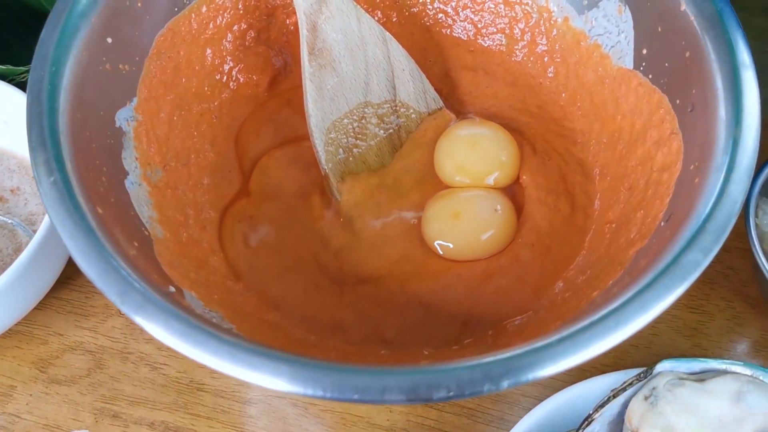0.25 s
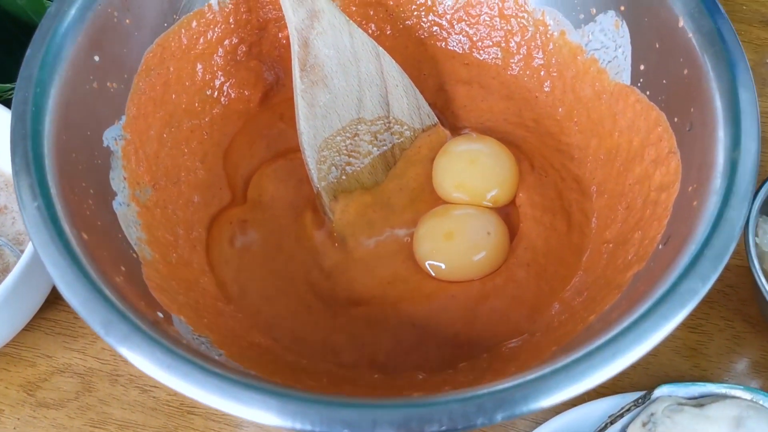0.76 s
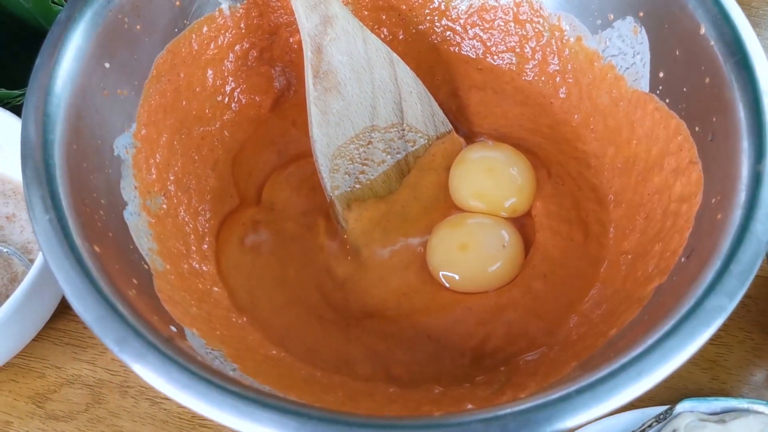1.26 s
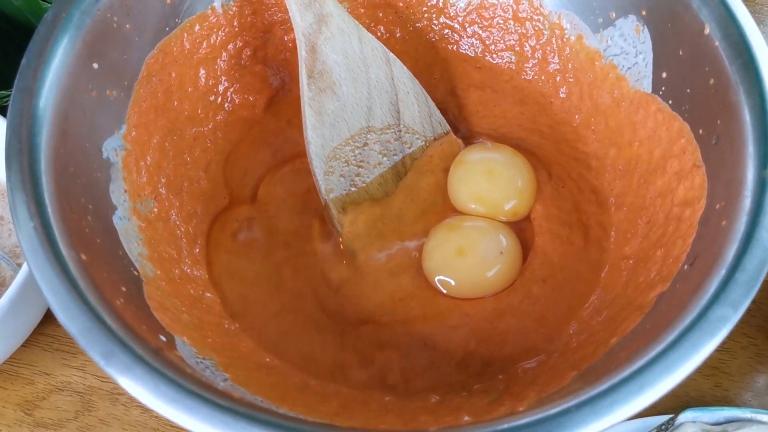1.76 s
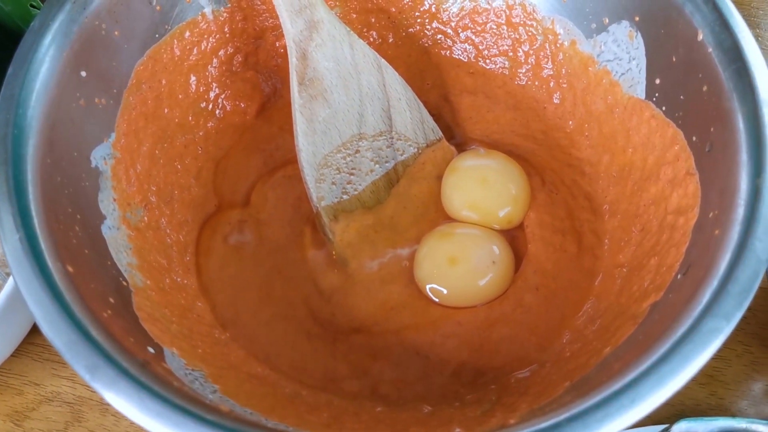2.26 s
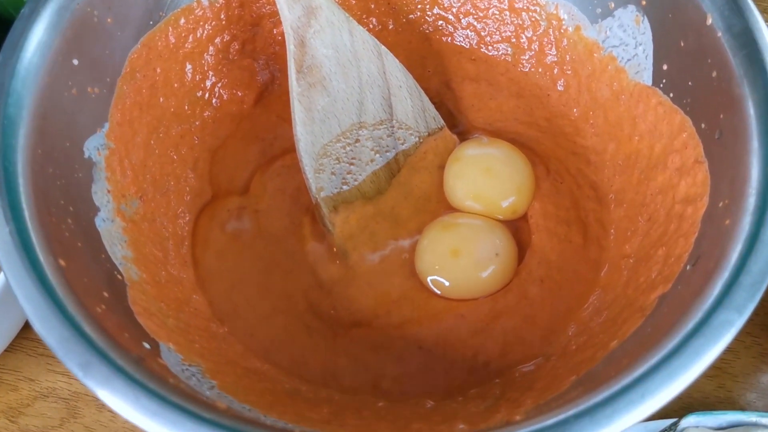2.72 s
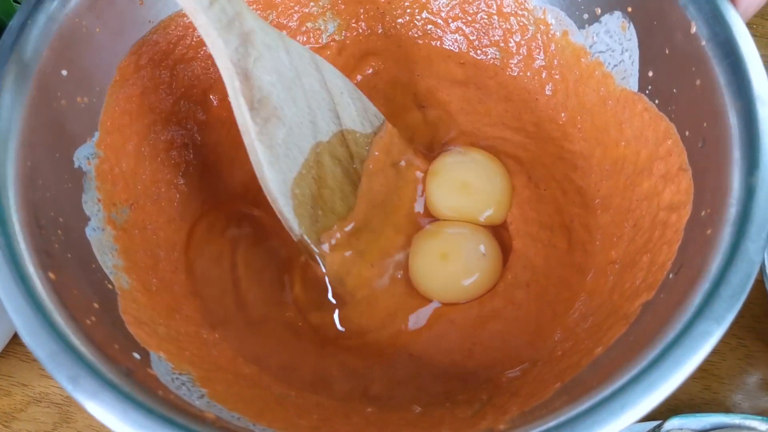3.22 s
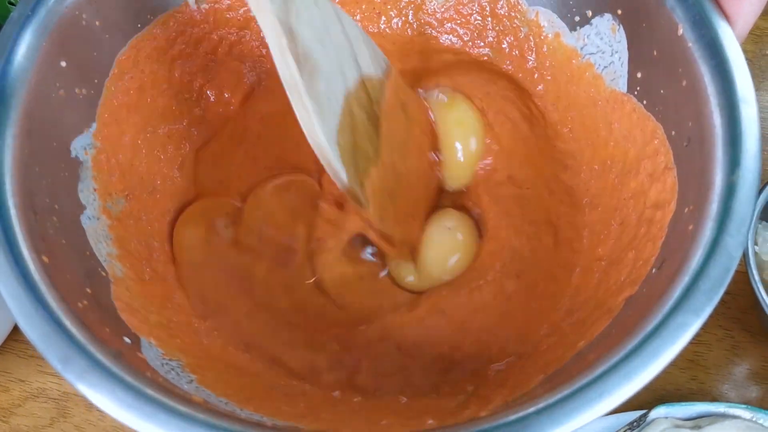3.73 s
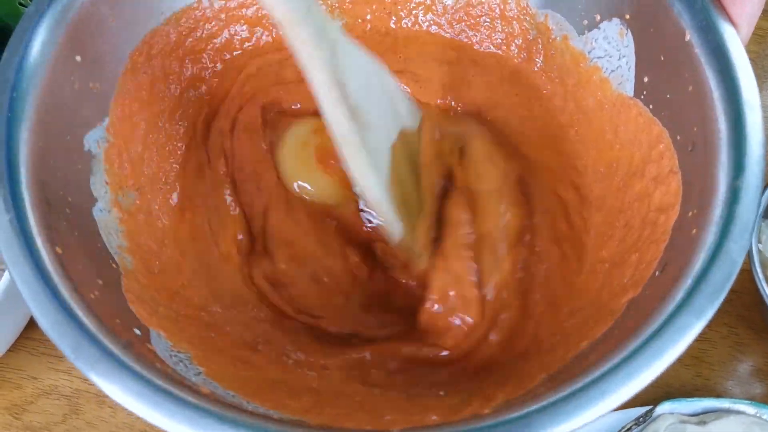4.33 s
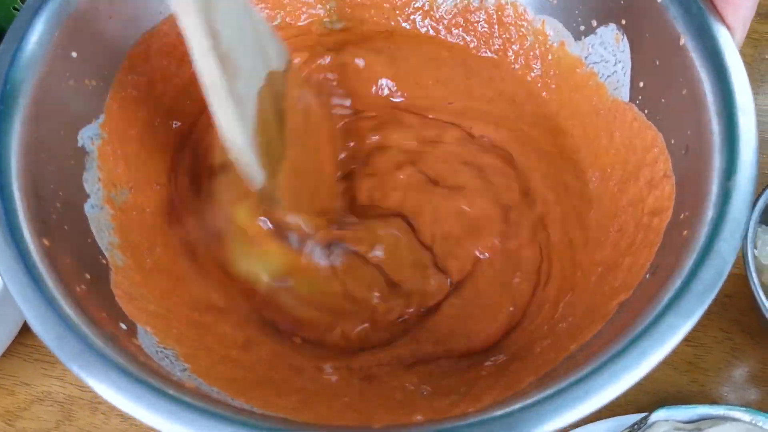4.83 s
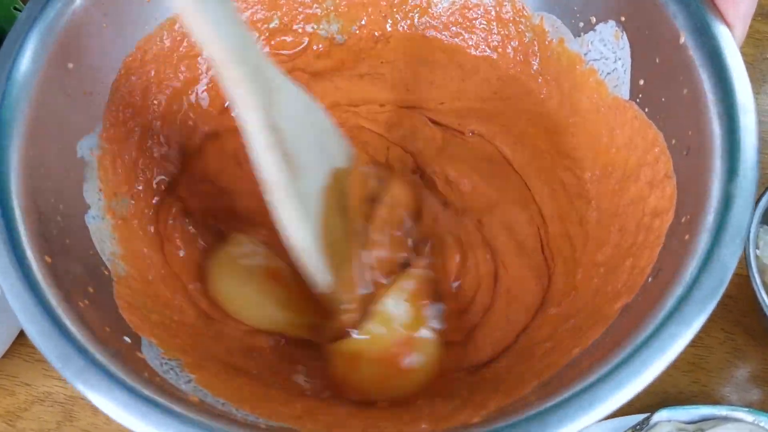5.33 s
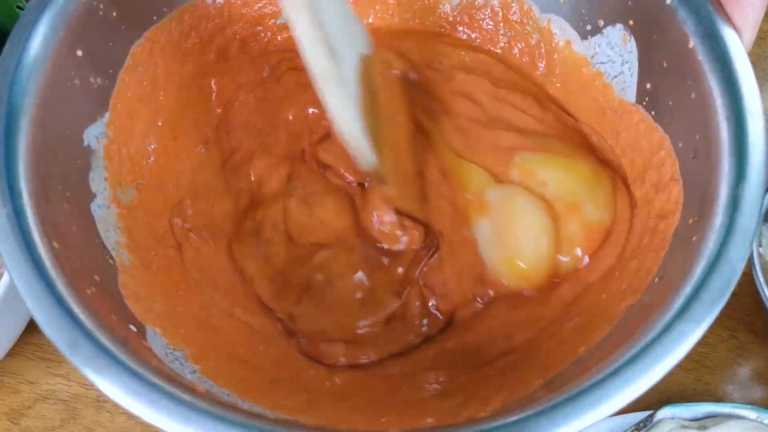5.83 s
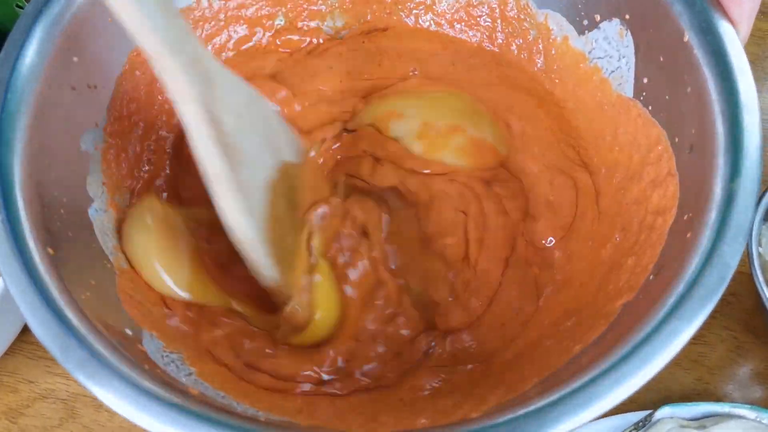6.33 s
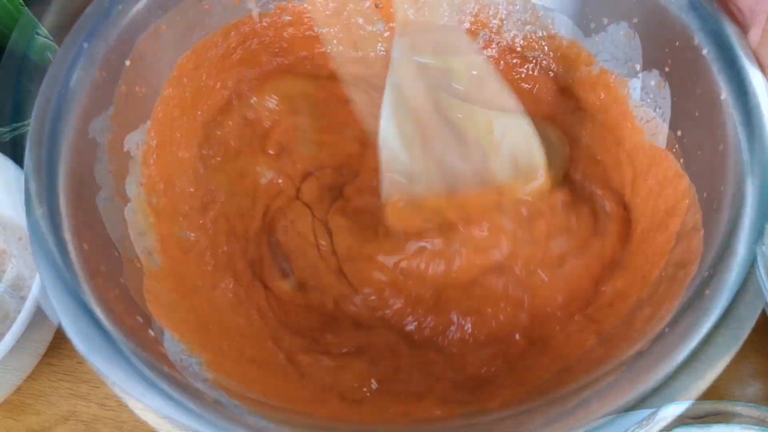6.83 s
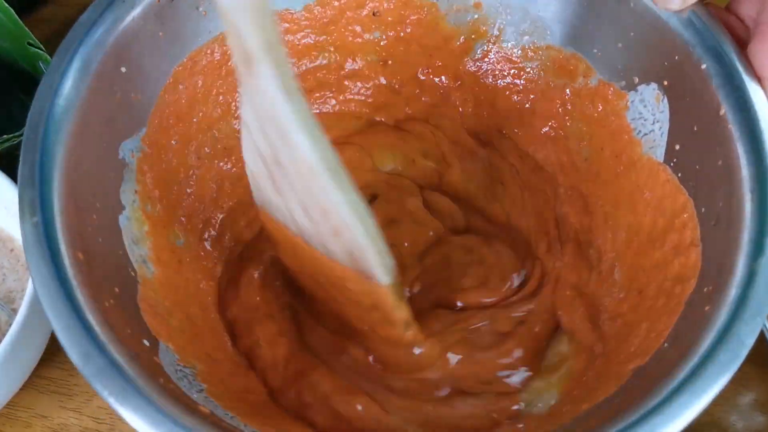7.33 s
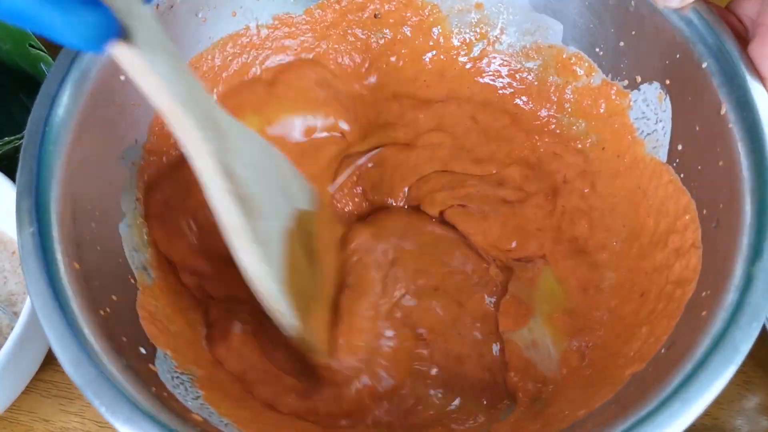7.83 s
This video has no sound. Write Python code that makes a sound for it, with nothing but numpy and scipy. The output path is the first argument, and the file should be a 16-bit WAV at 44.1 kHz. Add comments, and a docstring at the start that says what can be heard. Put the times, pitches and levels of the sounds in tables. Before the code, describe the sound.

In a lively kitchen, dishes knock sharply on a wooden table, then a spatula stirs thick batter with small wet pops and dull bowl bumps.

```python
"""In a hard-walled kitchen a small bowl and then a second dish are knocked and set on a wooden table.
A gloved hand slides along a spatula, which then stirs a thick batter in a steel bowl.
Dishes are noise thuds with dying sines; the batter is soft noise, cracks and short ringing cavities.
An appliance hums with wavering tones over the quiet noise of the room; random reflections make the walls."""
import sys
import numpy as np
from scipy import signal
from scipy.fft import rfft, irfft
from scipy.io import wavfile
from scipy.ndimage import uniform_filter1d

SR = 44100
rng = np.random.default_rng(int(sys.argv[2]) if len(sys.argv) > 2 else 0)


def wav_record(signal):
    """Record a signal, one row per channel, as 16-bit PCM in the file named by sys.argv[1]."""
    frames = np.transpose(np.atleast_2d(signal))
    bounded = np.clip(frames, -1, 1)
    # unit amplitude maps onto the largest positive 16-bit level
    quanta = np.round(bounded * 32767).astype(np.int16)
    wavfile.write(sys.argv[1], SR, quanta)


N = 355887  # length in samples


def gain_of(db):
    """Turns decibels into a multiplying factor."""
    return 10 ** (np.asarray(db) / 20)


def evened(x):
    """Scales a sound to an rms (average strength) of 1."""
    return x / np.sqrt(np.mean(x ** 2) + 1e-20)


def read(points, hz):
    """Reads a table between its points, on a logarithmic frequency scale."""
    table_hz, value = np.transpose(points)
    return np.interp(np.log(hz + 1e-3), np.log(table_hz), value)


def add(mix, s, sound, pan_db):
    """Places a two-channel sound at a time; the nearer microphone gets it louder and a little earlier."""
    for row, wave, side in zip(mix, sound, (1, -1)):
        lead_s = side * np.clip(pan_db, -8, 8) * 1.2e-5
        part = row[round((s - lead_s) * SR):][:len(wave)]
        part += wave[:len(part)] * gain_of(side * pan_db / 2)


def partner(left, other, same):
    """Mixes a right channel that is like the left by the share same (1 = identical, 0 = unrelated)."""
    return same * left + np.sqrt(1 - same ** 2) * other


def noise(spectrum, same, patchy_db, lean=0, size=512):
    """Two-channel noise from random short-time spectra, with patches that drift in time and pitch."""
    frames, hz = N // (size // 4) + 5, np.fft.rfftfreq(size, 1 / SR)
    a, b, c, d, patches = rng.standard_normal((frames, len(hz), 5)).T
    patches = uniform_filter1d(uniform_filter1d(patches, size=8, axis=0), size=12, axis=1)
    patches = evened(patches)
    same = np.clip(same * np.ones(len(hz)), -1, 1)[:, None]
    left = a + 1j * b
    right = partner(left, c + 1j * d, same) / gain_of(lean)
    colour = gain_of(read(spectrum, hz)[:, None] + patchy_db * patches)
    below_top = (hz < spectrum[-1][0])[:, None]
    frames_out = np.array([left, right]) * colour * below_top
    return evened(signal.istft(frames_out, nperseg=size, noverlap=size * 3 // 4)[1][:, :N])


def burst(spectrum, unit_hz, tilt_db, t60, rise_s, same):
    """A short dying puff of noise, peak about 1; the spectrum is read in multiples of unit_hz."""
    t, hz = np.arange(8192) / SR, np.fft.rfftfreq(8192, 1 / SR)
    a, b = rng.standard_normal((2, 8192))
    pair = np.array([a, partner(a, b, np.clip(same, -1, 1))])
    colour = gain_of(read(spectrum, hz / unit_hz) + tilt_db * np.log2(hz / 6000 + 0.00033))
    rise = np.sin(np.pi / 2 * np.minimum(t / rise_s, 1)) ** 2
    return evened(irfft(rfft(pair) * colour)) * gain_of(-60 * t / t60) * rise / 2


FULL_FLUTTER_HZ = 5000  # lower modes flutter less and differ less between the microphones


def ring(hz, db, t60, free_s, rise_s, spread, flutter):
    """Dying sines, damped harder after free_s; chatter makes each mode flutter, each microphone has its phase."""
    share = np.clip(hz / FULL_FLUTTER_HZ, .35, 1)[:, None]
    t = np.arange(30000) / SR
    phase = spread * share * rng.standard_normal((2, len(hz), 1))
    chatter = signal.resample_poly(rng.standard_normal((2, len(hz), 100)), 300, 1, axis=2)
    damping_db = 400 * np.maximum(t - free_s, 0)
    fall_db = 60 * t / np.clip(t60, .01, 1.2)[:, None] + damping_db
    fade = gain_of(db[:, None] - fall_db) * np.minimum(t / rise_s, 1) * (1 + flutter * share * chatter)
    return (fade * np.sin(2 * np.pi * hz[:, None] * t + phase)).sum(1)


def fuzz(width_hz):
    """Slow complex noise that spreads a tone into a narrow band."""
    memory = np.exp(-np.pi * width_hz / SR)
    drift = evened(signal.lfilter([1], [1, -memory], rng.standard_normal((2, N))))
    return drift[0] + 1j * drift[1]


# how the main hum swells, sinks and drifts: start_s, level_db, pitch_hz
HUM_PATH = [(0.0, -57, 173.0), (0.38, -48.5, 170.3), (0.69, -54, 170.9), (0.85, -42.5, 172.7),
            (0.94, -53.5, 174.8), (1.37, -49.5, 172.8), (1.41, -53, 170.9), (2.22, -50.5, 175.2),
            (2.43, -45, 172.4), (2.58, -53, 171.4), (3.01, -44, 171.8), (3.12, -58.5, 171.6),
            (3.23, -53.5, 176.6), (4.02, -48.5, 170.3), (4.43, -46, 173.3), (5.12, -50, 173.0),
            (5.28, -40.5, 173.0), (6.0, -44.5, 172.8), (6.34, -43.5, 170.5), (6.68, -58.5, 169.4),
            (6.79, -45, 170.7), (6.99, -40.5, 173.4), (7.4, -50.5, 172.8), (8.07, -49, 171.2)]
HUM_WAVER_WIDTH_HZ, HUM_WAVER_DB = 4, -8.5  # narrow fuzz around the tone, in dB relative to it
UPPER_HUM_HZ, UPPER_HUM_WIDTH_HZ, UPPER_HUM_DB = 220, 5, -57
LOW_HUM_HZ, LOW_HUM_WIDTH_HZ, LOW_HUM_DB = 50.5, 3.4, -64


def hum():
    """A wavering tone with fuzzier ones above and below; all reach the left microphone first."""
    t, (s, db, hz) = np.arange(N) / SR, np.transpose(HUM_PATH)
    turn = np.exp(2j * np.pi * np.cumsum(np.interp(t, s, hz)) / SR)
    waver = gain_of(HUM_WAVER_DB) * fuzz(HUM_WAVER_WIDTH_HZ)
    tone = gain_of(np.interp(t, s, db)) * turn * (np.sqrt(2) + waver)
    upper = gain_of(UPPER_HUM_DB) * fuzz(UPPER_HUM_WIDTH_HZ) * np.exp(2j * np.pi * UPPER_HUM_HZ * t)
    low = gain_of(LOW_HUM_DB) * fuzz(LOW_HUM_WIDTH_HZ) * np.exp(2j * np.pi * LOW_HUM_HZ * t)
    # left, then right: a small step in level (dB) and in phase (radians)
    sides = gain_of([[.3], [-.3]]) * np.exp(1j * np.array([[.1], [-.1]]))
    return ((tone + upper + low) * sides).real


# colour of the room's noise: pitch_hz, level_db (relative, per Hz)
ROOM_COLOUR = [(18, -43.5), (30, -12), (40, -13.5), (50, -13.5), (65, -17), (110, -9.5), (140, -15.5),
               (200, -14.5), (340, -19.5), (720, -23), (900, -33.5), (2600, -40), (3500, -46),
               (7000, -50.5), (15800, -57)]
ROOM_DB = -52  # overall level
# how alike the room is in both microphones: pitch_hz, likeness (1 = the same)
ROOM_LIKENESS = [(40, .995), (120, .97), (300, .9), (700, .7), (1650, .3), (5000, .1), (15000, 0)]
# how the room leans to one side: pitch_hz, left_over_right_db
ROOM_LEAN = [(60, 2.5), (180, 6.5), (550, -0.5), (1650, -1), (4970, 1.5), (15000, -3)]


def room_tone():
    """Steady rumble and hiss of the kitchen: noise, more alike on both sides at low pitches."""
    hz = np.fft.rfftfreq(2048, 1 / SR)
    lean = read(ROOM_LEAN, hz)[:, None]
    return gain_of(ROOM_DB) * noise(ROOM_COLOUR, read(ROOM_LIKENESS, hz), patchy_db=2.5, lean=lean, size=2048)


# loudness of the stirring, before a fixed cut of 4.5 dB: start_s, level_db
STIR_LEVELS = [(3.0, -75.5), (3.3, -56.5), (3.51, -72), (4.16, -62), (4.9, -66.5), (6.05, -62), (6.47, -64),
               (6.83, -60), (7.66, -65), (8.07, -59.5)]
IDLE_DB = -76  # level at time 0, before the same cut
# colour of the swish: pitch_hz, level_db (relative, per Hz)
SWISH_COLOUR = [(900, -21), (2000, 1), (4500, -3.5), (7000, -4), (9000, -12.5), (15800, -11.5)]


def swish():
    """Soft wet noise of the batter that follows the stirring."""
    s, db = np.transpose(STIR_LEVELS)
    level_db = np.interp(np.arange(N) / SR, [0, *s], [IDLE_DB, *db]) - 4.5
    return gain_of(level_db) * noise(SWISH_COLOUR, same=0.2, patchy_db=4.0)


def knocks(rows, hz, modes, thud):
    """Each knock thuds on the table; the spot struck decides which modes of the dish ring."""
    thuds, rings = np.zeros((2, N)), np.zeros((2, N))
    t60s, *spots = np.transpose(modes)
    for s, db, thud_hz, t60, ring_db, spot, free_s, pan_db in rows:
        nearest_spot = min(round(spot), len(spots) - 1)
        level_db = ring_db + spots[nearest_spot]
        thud_sound = burst(thud, thud_hz, 0, t60, rise_s=0.0021, same=0.36)
        add(thuds, s, gain_of(db) * thud_sound, pan_db)
        ring_sound = ring(np.array(hz), level_db, t60s, free_s, rise_s=0.00015, spread=0.72, flutter=1.0)
        add(rings, s, ring_sound, pan_db)
    return np.array([thuds, rings])


# knocks on the small bowl: start_s, thud_peak_db (about), thud_pitch_hz, thud_60_db_fall_s, ring_db,
# spot_struck (rounded; past the last means the last), free_s (until a hand or the table damps it),
# left_over_right_db
SMALL_BOWL_STRIKES = [(.0235, -2, 950, 0.065, -3.5, 0.5, .3, -1.5),
                      (.031, -7.5, 970, 0.053, 0, 3, 0.028, -2.5), (.079, -21.5, 870, .08, 1, 1, 0.14, 3.5),
                      (.2245, -16, 930, 0.075, 5.5, 2, 0.0033, 5.5),
                      (.3135, -12, 713, 0.055, 0, 16, 0.36, -4)]
# pitches at which the small bowl rings: pitch_hz
SMALL_BOWL_PITCHES = [785, 985, 1140, 1500, 1723, 1759, 2955, 3059, 4060, 4159, 4204, 4330, 5335, 7111,
                      7198, 7343, 7800, 8383, 10560, 10705, 10830, 11040, 11420, 14700, 14835, 15030]
# a row for each of those pitches: 60_db_fall_s, then level_db for each spot struck (ring_db is added)
SMALL_BOWL_MODES = [(0.22, -18.5, -25, -25.5, -67, -51), (0.041, -19.5, -44, -41.5, -67, -54),
                    (0.2, -40, -24.5, -30, -67.5, -53), (0.12, -45, -27, -37, -68, -44),
                    (0.99, -45, -29.5, -47, -67, -65), (0.13, -34, -54, -73.5, -67, -65),
                    (0.62, -53.5, -74.5, -49, -70, -46), (0.2, -56, -66, -35.5, -68, -59),
                    (0.35, -50.5, -74, -29.5, -40.5, -51), (0.15, -27, -70, -42, -13.5, -24),
                    (0.14, -37, -74, -18, -25.5, -59), (0.48, -37, -71, -36.5, -25, -43.5),
                    (0.13, -61, -68.5, -49.5, -71.5, -37), (0.08, -42.5, -59.5, -31, -66.5, -65),
                    (0.2, -22.5, -71.5, -61.5, -67, -38), (0.245, -54.5, -68, -39, -66, -48),
                    (0.073, -64, -66.5, -34.5, -66.5, -39), (0.072, -77.5, -72, -47.5, -67, -46),
                    (0.19, -59, -69.5, -45, -66, -69), (0.28, -29, -69.5, -61, -71, -51.5),
                    (0.25, -61.5, -64.5, -42.5, -65.5, -75), (0.58, -42, -68.5, -67, -66, -65),
                    (0.16, -47.5, -66.5, -44, -69, -58), (0.1, -55.5, -71.5, -51.5, -65.5, -72),
                    (0.13, -58, -74.5, -56, -63, -70), (0.13, -57, -62, -49.5, -67, -54)]
# colour of the table's thud under it: multiple_of_thud_pitch, level_db (relative, per Hz)
SMALL_BOWL_THUD_COLOUR = [(.1, -45.5), (.22, -30), (.3, -11.5), (.42, -17), (.6, -7), (.85, 4), (1.3, -5),
                          (2.5, -12), (5, -22.5), (10, -43.5), (22, -52.5)]


def small_bowl():
    """The small bowl's modes ring over noise thuds of the table."""
    return knocks(SMALL_BOWL_STRIKES, SMALL_BOWL_PITCHES, SMALL_BOWL_MODES, SMALL_BOWL_THUD_COLOUR)


# a dish rocks on its foot and taps the table: start_s, peak_db (about), pitch_hz, left_over_right_db
ROCK_TAPS = [(0.035, -3.5, 757, -11.5), (0.099, -16.5, 1160, 10.5), (0.129, -22, 794, -3),
             (0.239, -14.5, 784, 14.5), (2.234, -16, 750, 13), (2.589, -23, 1140, 1), (2.619, -23, 800, -3),
             (2.669, -18, 1160, -4), (2.709, -25, 771, -12), (2.768, -21, 930, 0.5),
             (2.806, -22.5, 810, -5), (2.829, -28.5, 820, -9), (2.862, -26, 805, -11),
             (2.908, -35.5, 810, -27)]
# colour of a tap: multiple_of_pitch, level_db (relative, per Hz)
ROCK_COLOUR = [(.2, -30), (.5, -8), (.9, 0), (1.3, -4), (1.8, -22), (3, -50), (8, -80)]


def rocking():
    """Soft low taps without ring: short puffs of noise."""
    out = np.zeros((2, N))
    for s, db, hz, pan_db in ROCK_TAPS:
        tap = burst(ROCK_COLOUR, hz, 0, t60=.03, rise_s=0.0032, same=0.66)
        add(out, s, gain_of(db) * tap, pan_db)
    return out


# strokes of glove and spatula: start_s, rise_s, hold_s, fall_s, level_db
RUB_STROKES = [(0.392, 0.057, 0.096, .09, -58.5), (3.134, 0.05, .005, 0.028, -49.5),
               (3.194, 0.034, 0.053, 0.056, -46), (3.314, 0.081, 0.078, .02, -45.5),
               (7.334, 0.053, 0.042, .06, -58), (7.701, 0.028, 0.058, 0.024, -61.5)]
# colour of the rubbing: pitch_hz, level_db (relative, per Hz)
RUB_COLOUR = [(710, -45.5), (1200, -12), (1510, -19), (1680, -39.5), (1930, -7.5), (3100, -13.5), (4680, 0),
              (5160, -2), (10700, -1), (15800, -4)]
RUB_RANGE_DB = 20.5  # depth of each rise and fall


def rubbing():
    """Fine hiss of rubber or batter sliding over wood; each stroke rises, holds and falls."""
    t, level = np.arange(N) / SR, np.zeros(N)
    for s, rise, hold, fall, db in RUB_STROKES:
        times = np.cumsum([s, rise, hold, fall])
        shape_db = np.interp(t, times, [-RUB_RANGE_DB, 0, 0, -RUB_RANGE_DB], left=-99, right=-99)
        level += gain_of(db + shape_db)
    return level * noise(RUB_COLOUR, same=0.15, patchy_db=4.5, size=256)


SMALL_POP_COUNT, SMALL_POPS_FROM_S = 10, 4.0
SMALL_POP_DB, SMALL_POP_SPREAD_DB, SMALL_POP_CRACK_DB = -56.5, 5.5, 8  # lowest peak, spread above, crack over it
SMALL_POP_LOW_HZ, SMALL_POP_HIGH_HZ = 1150, 2400


def small_pops():
    """Small pockets burst at random while the batter is stirred; rows like those of the clear pops."""
    rows = []
    for when, size, pitch, side in rng.random((SMALL_POP_COUNT, 4)):
        s = SMALL_POPS_FROM_S + when * (N / SR - SMALL_POPS_FROM_S)
        db = SMALL_POP_DB + SMALL_POP_SPREAD_DB * size
        hz = SMALL_POP_LOW_HZ * (SMALL_POP_HIGH_HZ / SMALL_POP_LOW_HZ) ** pitch
        rows.append((s, db, hz, SMALL_POP_CRACK_DB, 2.5, 12 * (side - .5)))
    return rows


# clear pops in the batter, and the clicks of two spatula bumps (6.87, 7.23 s): start_s, peak_db,
# cavity_pitch_hz, crack_over_cavity_db, crack_brightness_db_per_octave, left_over_right_db
POPS_AND_CLICKS = [(0.8237, -50, 5500, -4, 1.5, -1), (3.7404, -39.5, 1920, 2, -1.5, -1.5),
                   (3.9505, -37.5, 1865, -4, -3, 14.5), (4.0021, -31, 2874, 12.5, 7, 1.5),
                   (4.1638, -36.5, 4740, -15, 9, 12), (4.1688, -39, 1900, 9, -1, 5),
                   (4.4556, -38, 1366, 9.5, -5, 6.5), (4.4676, -35.5, 1913, -1, 4, 2),
                   (4.5418, -48, 4610, 9, 0, 0.5), (4.792, -41, 2185, -7, -1, -4),
                   (4.8209, -28, 6000, -5, 7, 5), (4.9734, -34.5, 5770, 22.5, 8.5, -7),
                   (5.5379, -59, 2354, 14, -4, 0), (5.7142, -47, 1220, 4, 7, 0.5),
                   (5.743, -41, 1270, -2.5, 5, -8), (5.9293, -37.5, 5400, -1, 9, -7.5),
                   (6.236, -56, 2120, 19, 9.5, 0.5), (6.4383, -33.5, 6900, -3, 2, -5),
                   (6.549, -31.5, 2154, 3, 11, -1.5), (6.5578, -21, 10670, -15, 17, -4.5),
                   (6.7083, -42, 5560, 15, 8, 6), (6.8455, -56.5, 1196, 18.5, 4, -1),
                   (6.8705, -41, 1095, 12.5, -1.5, 5.5), (7.0614, -35, 4730, 12.5, 9, -1.5),
                   (7.202, -39, 3000, 1, 3, -8.5), (7.2276, -35, 1146, -1, -3, -1.5),
                   (7.518, -55.5, 1394, 20.5, 5, -5.5), (7.735, -33, 6000, -5, 3.5, 1.5),
                   (7.764, -36.5, 5020, -10, 4, 1), (7.8956, -52.5, 4030, 17.5, 8.5, -2),
                   (7.9983, -62.5, 1500, 15, 5.5, 3.5), (8.023, -43, 2320, 11.5, -2.5, 0)]
# colour of a crack: pitch_hz, level_db (relative, per Hz)
CRACK_COLOUR = [(900, -39), (1800, -29), (3000, 7), (4500, 7.5), (6000, 7.5), (8000, -6.5), (11000, 0.5),
                (15000, -9), (17000, -14.5)]
# echoes inside the steel bowl: delay_s, level_db
STEEL_ECHOES = [(.0016, -10), (.0034, -13), (.0055, -17)]
BOWL_ECHO_TOP_HZ = 7160  # batter on the steel swallows the treble above
POP_CYCLES = 20  # cycles for a cavity to fall 60 dB
FIZZ_DB, FIZZ_T60_S = -7, .007  # fizz under the crack


def pops_and_clicks():
    """A pop cracks and fizzes, its cavity rings with rising pitch, the steel echoes; bump clicks are made alike."""
    out, t, bins = np.zeros((2, N)), np.arange(4096) / SR, np.fft.rfftfreq(256, 1 / SR)
    for s, db, hz, crack_db, tilt_db, pan_db in POPS_AND_CLICKS + small_pops():
        turns = hz * t
        rising_turns = turns * (1 + 0.0014 * np.minimum(turns, 40))
        cavity = np.sin(2 * np.pi * rising_turns) * gain_of(-60 * turns / POP_CYCLES)
        colour = gain_of(read(CRACK_COLOUR, bins) + tilt_db * np.log2(bins / 6000 + 0.00068))
        crack = np.fft.fftshift(irfft(colour)) * np.hanning(256)
        fizz = burst(CRACK_COLOUR, 0.85, tilt_db, t60=FIZZ_T60_S, rise_s=0.00034, same=0.47)
        add(out, s, gain_of(db) * np.array([cavity, cavity]), pan_db)
        # start half a crack early, so that its peak falls on s
        add(out, s - 128 / SR, gain_of(db + crack_db) * np.array([crack, crack]) / crack.max(), pan_db)
        add(out, s, gain_of(db + crack_db + FIZZ_DB) * fizz, pan_db)
    echoes = sum(gain_of(db) * np.roll(out, round(delay * SR), axis=1) for delay, db in STEEL_ECHOES)
    treble_cut = signal.butter(2, BOWL_ECHO_TOP_HZ, fs=SR, output="sos")
    return out + signal.sosfilt(treble_cut, echoes)


# knocks on the second dish: the same columns as SMALL_BOWL_STRIKES (start_s, thud_peak_db (about),
# thud_pitch_hz, thud_60_db_fall_s, ring_db, spot_struck, free_s, left_over_right_db)
DISH_STRIKES = [(2.217, -15, 756, 0.044, 1.56, 0, 0.22, 7.5), (2.527, -7, 857, 0.063, 1.1, 1, 0.392, -3.5)]
# pitches at which the dish rings: pitch_hz
DISH_PITCHES = [345, 639, 750, 867, 1126, 1459, 1825, 2205, 2303, 2406, 3066, 3548, 3765, 3850, 5187, 5240,
                5424, 6029, 6780, 7150, 8192, 8240, 8445, 8905, 9300, 10000, 10261, 10792, 11582, 12468,
                12780, 14192, 14338]
# a row for each of those pitches: 60_db_fall_s, then level_db for each spot struck (ring_db is added)
DISH_MODES = [(0.25, -44.5, -37), (0.19, -25, -48.5), (0.28, -27.5, -50), (0.36, -47, -35.5),
              (0.23, -43, -31), (0.19, -73, -35.5), (0.78, -76, -41.5), (0.4, -46, -55),
              (0.87, -47.5, -33.5), (1, -54, -28.5), (0.99, -62, -47), (0.98, -54, -39), (0.8, -55, -42.5),
              (1, -61, -44), (0.89, -76, -53), (0.82, -66, -49), (0.64, -66, -45.5), (0.51, -51, -37.5),
              (0.71, -67, -50), (0.32, -54, -79), (0.17, -47, -36.5), (0.87, -75, -59), (0.34, -79, -54),
              (0.18, -43, -32), (0.83, -78, -59), (0.13, -67, -66), (0.13, -70, -60), (0.36, -71, -51.5),
              (0.18, -70, -44), (0.25, -71, -63), (0.25, -71, -58), (0.19, -84, -49), (0.17, -84, -58)]
# colour of the table's thud under it: multiple_of_thud_pitch, level_db (relative, per Hz)
DISH_THUD_COLOUR = [(.1, -44), (.3, -30), (.7, 9.5), (1.3, 2), (2.8, 4.5), (5, -6), (10, -28), (22, -47)]


def second_dish():
    """The second dish's modes ring over noise thuds of the table."""
    return knocks(DISH_STRIKES, DISH_PITCHES, DISH_MODES, DISH_THUD_COLOUR)


# one pocket that closes slowly: start_s, peak_db, first_pitch_hz, last_pitch_hz, length_s
SLOW_POCKET = (5.7145, -43, 1220, 1720, .028)


def squelch():
    """A shrinking cavity whistles upward as it fades."""
    s, db, first_hz, last_hz, length = SLOW_POCKET
    out, part = np.zeros((2, N)), np.arange(0, 1, 1 / (length * SR))
    turns = np.cumsum(first_hz + (last_hz - first_hz) * part ** 1.64) / SR
    soft_ends = signal.windows.tukey(len(part), .2)
    whistle = gain_of(db - 15 * part) * np.sin(2 * np.pi * turns) * soft_ends
    add(out, s, np.array([whistle, whistle]), pan_db=3)
    return out


# the spatula bumps the full bowl: start_s, peak_db, push_pitch_hz, ring_over_push_db, left_over_right_db
SPATULA_BUMPS = [(6.867, -24.5, 536, -18.5, 4), (7.043, -44, 557, -11.5, -3.5), (7.225, -23, 566, -18, 5.5),
                 (7.564, -32, 352, -15, -5)]
# how the full steel bowl rings: pitch_hz, level_db (added to the bump's ring level), 60_db_fall_s
FULL_BOWL_MODES = [(357, -4, 0.088), (467, 6.5, 0.034), (576, 12.5, 0.06), (705.5, -5, 0.2),
                   (880, -2.5, 0.089), (1150, -0.5, 0.068), (1720, -6, 0.031), (2290, -9, 0.041)]


def bumps():
    """Soft wood gives a push of three faded cycles; the batter damps the steel to a short dull ring."""
    out, (hz, level_db, t60) = np.zeros((2, N)), np.transpose(FULL_BOWL_MODES)
    for s, db, push_hz, ring_db, pan_db in SPATULA_BUMPS:
        turns = np.arange(0, 3.0, push_hz / SR)
        push = -np.sin(2 * np.pi * turns) * np.hanning(len(turns))
        add(out, s - .001, gain_of(db) * np.array([push, push]), pan_db)
        mode_db = db + ring_db + level_db
        steel = ring(hz, mode_db, t60, free_s=.2, rise_s=0.0061, spread=0.52, flutter=3.5)
        add(out, s + 0.0013, steel, pan_db)
    return out


# how long the kitchen's reflections last: pitch_hz, 60_db_fall_s
WALL_FALL = [(200, 0.58), (800, 0.65), (2500, 0.69), (6000, .45), (14000, 0.23)]


def walls(x, gap_s=0.0076):
    """Dense random reflections, each band dying at its own speed, different at each microphone."""
    taps = rng.standard_normal((2, SR)) * (np.arange(SR) > gap_s * SR)
    hz, t, z = signal.stft(taps, SR, nperseg=256)
    fall = gain_of(-60 * t / read(WALL_FALL, hz)[:, None])
    tail = signal.istft(z * fall, SR, nperseg=256)[1]
    return signal.fftconvolve(x.mean(0)[None], tail / np.linalg.norm(tail[0]), axes=1)[:, :N]


def scene():
    """Dishes sound farther off and wetter than the bowl under the microphone: they feed the walls more."""
    thuds, rings = small_bowl() + second_dish()
    thuds = thuds + rocking()
    bowl = pops_and_clicks() + squelch() + bumps() + rubbing()
    wet = walls(gain_of(-5.0) * thuds + gain_of(-10) * rings + gain_of(-11) * bowl)
    return thuds + rings + bowl + wet + swish() + hum() + room_tone()


LOW_CUT_HZ, EDGE_HZ = 30, 16750  # lower and upper limits of the sound


def record(dry):
    """The microphone's low cut, a soft limit that keeps the highest peaks below full scale, then the band limit."""
    thinned = signal.sosfilt(signal.butter(4, LOW_CUT_HZ, "high", fs=SR, output="sos"), dry)
    limited = .9 * np.tanh(thinned / .9)
    band_limit = signal.firwin(511, EDGE_HZ, window=("kaiser", 9), fs=SR)
    return signal.oaconvolve(limited, band_limit[None], "same")


dry = scene()
out = record(dry)
wav_record(out)
```